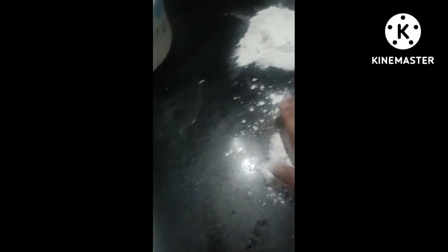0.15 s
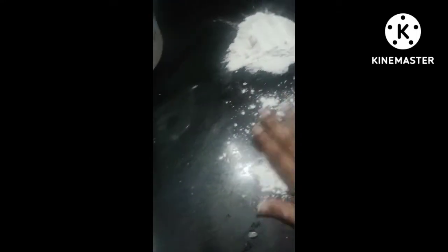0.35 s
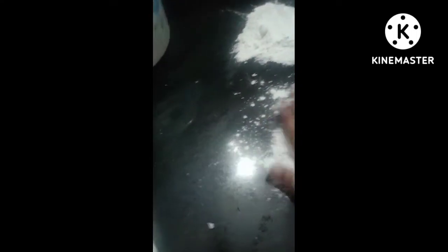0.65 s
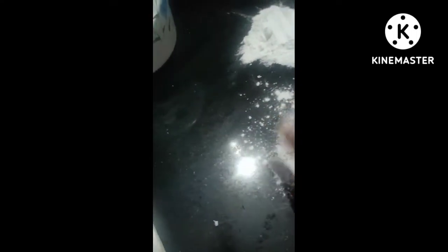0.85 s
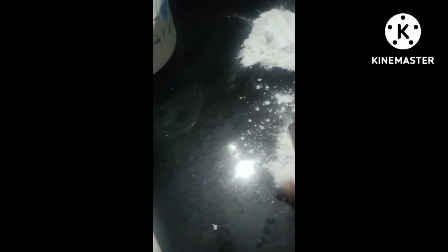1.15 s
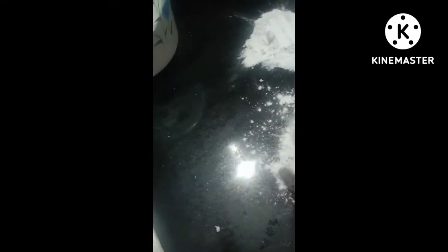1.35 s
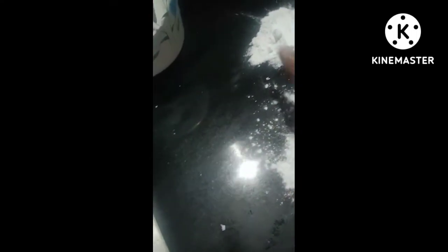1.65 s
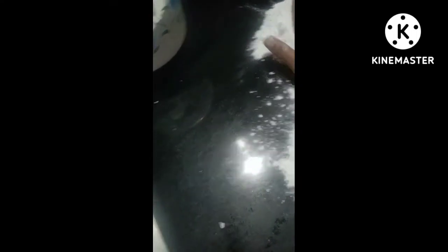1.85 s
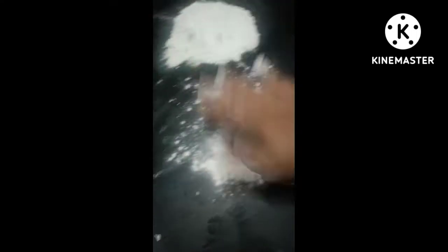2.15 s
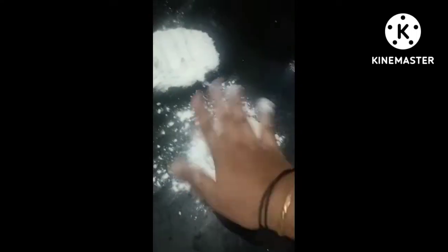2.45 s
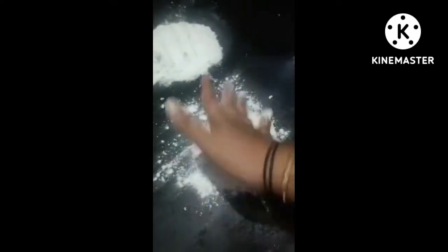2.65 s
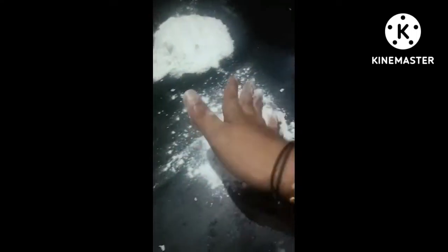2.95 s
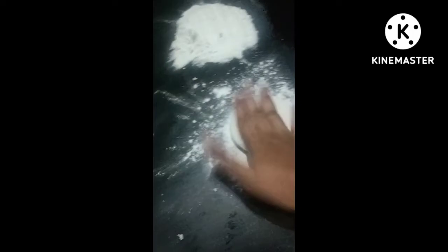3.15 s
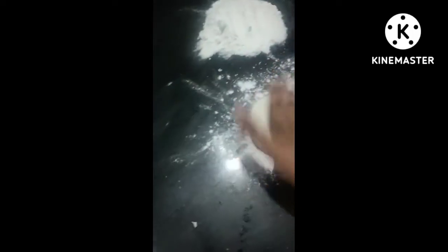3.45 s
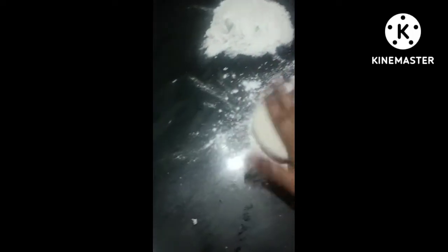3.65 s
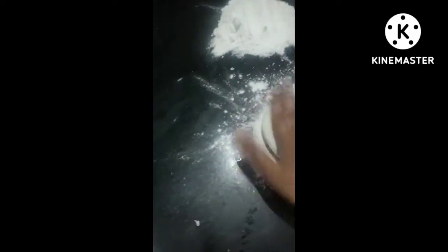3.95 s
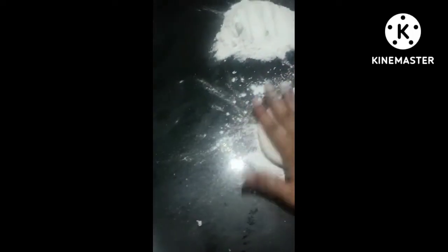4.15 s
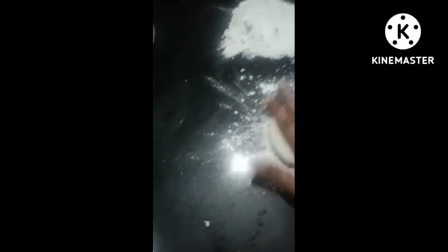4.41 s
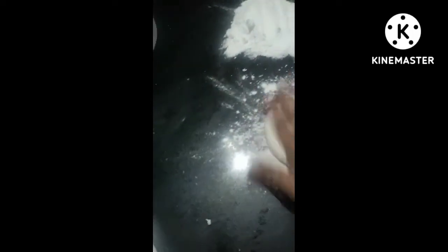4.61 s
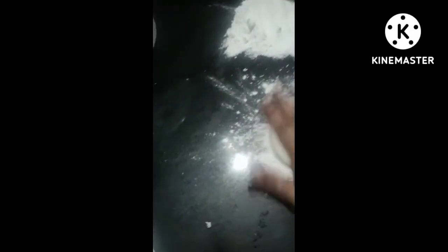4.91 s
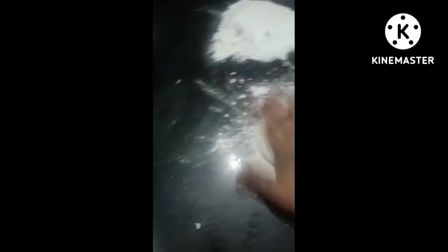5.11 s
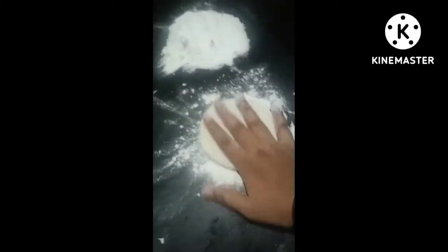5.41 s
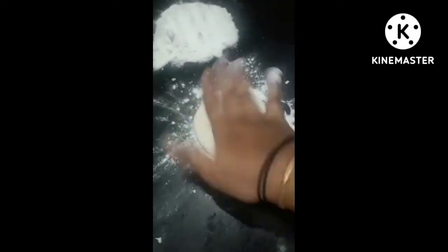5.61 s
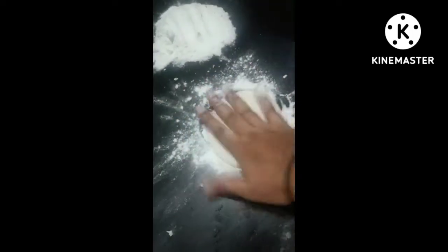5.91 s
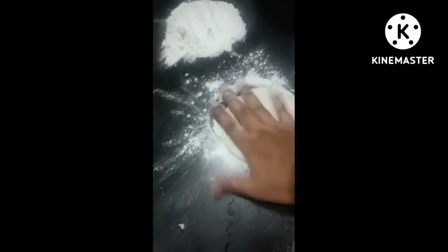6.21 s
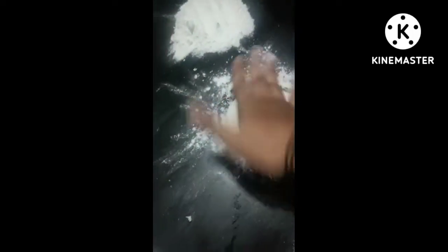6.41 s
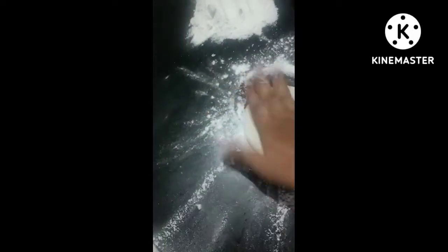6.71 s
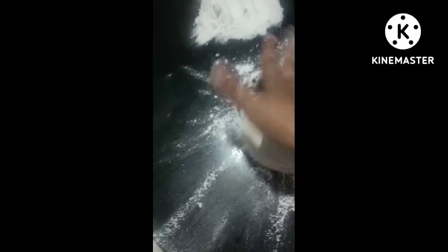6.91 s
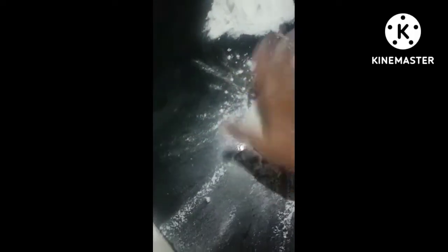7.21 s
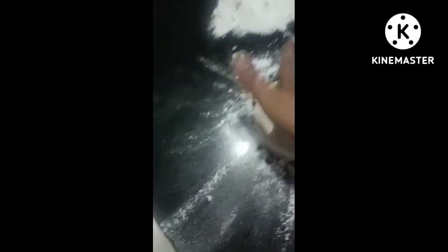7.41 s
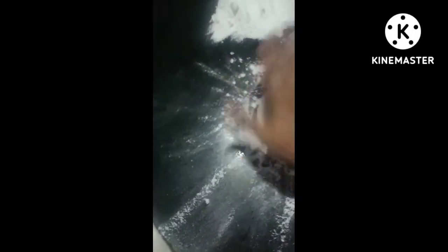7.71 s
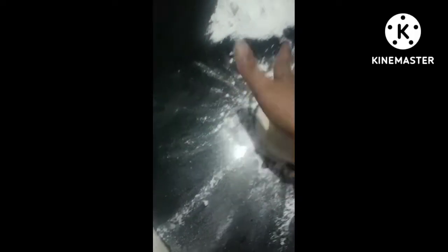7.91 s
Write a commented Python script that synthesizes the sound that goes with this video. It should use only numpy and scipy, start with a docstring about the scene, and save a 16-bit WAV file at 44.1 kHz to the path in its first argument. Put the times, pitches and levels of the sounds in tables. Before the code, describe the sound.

A hand pats floured dough on a hard kitchen counter, close to the microphone. Light fingertip touches lead into a few hollow, cupped pats. After a brief lull, the hand slaps flatter in an even rhythm, almost four times a second, mostly harder towards the end. Faint gritty rubbing and a few crisp ticks fall between pats. The small room rings briefly over a low rumble and hiss.

```python
"""A hand pats floured dough on a stone kitchen counter, close to a phone with two microphone ports.
First come light fingertip touches over the room's rumble and hiss. From about half a second, a cupped
hand pats the ball of dough: fingers land, the palm pops its trapped air, the small hard room rings.
Between pats the hand drags over flour, with a few crisp ticks. After 2.6 s the hand is flatter and
pats almost four times a second, mostly harder towards the end."""
import sys
import numpy as np
from scipy import signal
from scipy.fft import rfft, irfft, next_fast_len
from scipy.io import wavfile
from scipy.ndimage import uniform_filter1d

SR = 44100
rng = np.random.default_rng(int(sys.argv[2]) if len(sys.argv) > 2 else 0)


def store_pcm(level_fs):
    """Save levels as 16-bit WAV."""
    pcm = np.round(np.clip(level_fs, -1, 1) * 32767).astype(np.int16)
    wavfile.write(sys.argv[1], SR, np.atleast_2d(pcm).T)


N = 355446
LEAD_S = 0.01  # time kept free before each landing, for the fingers


def amp(db):
    """Turn decibels into a gain."""
    return 10 ** (np.asarray(db) / 20)


def unit(x):
    """Scale x to an average power of 1."""
    return x / np.sqrt(np.mean(x ** 2) + 1e-20)


def along(points, hz):
    """Read a curve of (pitch_hz, value) points on a log pitch scale."""
    pitches, values = np.transpose(points)
    return np.interp(np.log(hz + 1), np.log(pitches + 1), values)


def filtered(x, response):
    """Multiply each frequency in x by response(hz)."""
    size = next_fast_len(x.shape[-1] + 8192)
    hz = np.fft.rfftfreq(size, 1 / SR)
    return irfft(rfft(x, size) * response(hz), size)[..., :x.shape[-1]]


def coloured(x, tone):
    """Shape x with a curve of (pitch_hz, level_db) points."""
    return filtered(x, lambda hz: amp(along(tone, hz)))


def add(track, x, start_s):
    """Mix x into the track."""
    part = track[:, max(round(start_s * SR), 0):][:, :x.shape[1]]
    part += x[:, :part.shape[1]]


# How alike left and right are: pitch_hz, likeness (1 = the same)
LIKENESS = [(60, 0.94), (150, 0.53), (380, 1), (950, 0), (2380, 0), (5980, 0), (15000, 0.14)]
def stereo(spectra, hz):
    """Blend two unrelated noises into left and right, alike in the bass."""
    angle = np.arccos(np.clip(along(LIKENESS, hz), -1, 1))[:, None] / 2
    shared, side = spectra[0] * np.cos(angle), spectra[1] * np.sin(angle)
    return np.array([shared + side, shared - side])


def rush(tone, patchy_db=1.5):
    """Stereo noise with random louder and softer patches."""
    hz, _, spectra = signal.stft(rng.standard_normal((2, N)), SR, nperseg=512)
    patches = rng.standard_normal(spectra.shape[1:])
    patches = uniform_filter1d(uniform_filter1d(patches, 10, 0), 10, 1)
    _, noise = signal.istft(stereo(spectra, hz) * amp(patchy_db * unit(patches)), nperseg=512)
    return unit(coloured(noise[:, :N], tone))


# Tones of the room's rumble, hiss and thin whine: pitch_hz, level_db
RUMBLE_TONE = [(12, -35), (20, -9), (40, -15), (70, -9.5), (113, -2.5), (200, -31.5), (260, -76),
               (440, -120)]
HISS_TONE = [(25, -8), (110, -8.5), (200, -9), (370, -3.5), (880, -18.5), (2000, -29), (3500, -40.5),
             (6000, -34), (10000, -42), (12500, -43.5), (15900, -50)]
WHINE_TONE = [(3900, -42.5), (4500, -5), (4750, 8.5), (5100, -2.5), (5800, -21), (6400, -52.5)]
# How the background rises and falls: time_s, rumble_db, hiss_db
AIR_LEVELS = [(0.0, -64, -62), (0.87, -62, -57), (2.02, -62.5, -63.5), (2.53, -64.5, -58.5),
              (5.09, -54.5, -52.5), (5.72, -68, -60.5), (6.06, -53, -50.5), (8.06, -58, -52)]
def kitchen_air():
    """A low rumble, a faint hiss and a thin, steady whine."""
    times, rumble_db, hiss_db = np.transpose(AIR_LEVELS)
    t = np.arange(N) / SR
    rumble = amp(np.interp(t, times, rumble_db)) * rush(RUMBLE_TONE)
    hiss = amp(np.interp(t, times, hiss_db)) * rush(HISS_TONE)
    return rumble + hiss + amp(-86.5) * rush(WHINE_TONE)


# Sheen, the finest noise of skin and flour: pitch_hz, level_db
SHEEN_TONE = [(5000, -2.5), (9000, 0.5), (11500, 2.5), (14000, -10), (15900, -22.5)]
# Crisp ticks between pats: start_s, level_db
CRISP_TICKS = [(0.1357, -46), (0.154, -46), (2.3324, -45), (2.4843, -49), (4.2323, -56), (6.314, -38),
               (6.3879, -48.5), (6.563, -63.5), (6.642, -32.5), (6.9152, -53)]
def ticks():
    """Short, bright bursts of noise."""
    track, t = np.zeros((2, N)), np.arange(SR // 30) / SR
    for start_s, level_db in CRISP_TICKS:
        burst = amp(level_db - 60 * t / 0.023) * (1 - np.exp(-t / 0.00089))
        add(track, burst * rng.standard_normal((2, len(t))), start_s)
    return coloured(track, SHEEN_TONE)


def blip(t, hz, cycles):
    """The hollow of the hand sounds for a few soft cycles."""
    age = 3 * t * hz / cycles
    return np.sin(2 * np.pi * hz * t) * age * np.exp(1 - age)


def scuffs(per_second=400, hollow_hz=1300):
    """Flour lumps catch under the cupped palm and sound near its pitch."""
    track, t = np.zeros((2, N)), np.arange(SR // 30) / SR
    for when, pitch, softness, side in rng.random((round(per_second * N / SR), 4)):
        hz = hollow_hz * np.exp(0.55 * (pitch - 0.5))
        grain = amp(-14 * softness) * blip(t, hz, cycles=8.6)
        add(track, grain * amp([[6 * side - 3], [3 - 6 * side]]), when * N / SR)
    return unit(track)


# Tone of rubbed flour: pitch_hz, level_db
FLOUR_TONE = [(400, -37), (800, 1.5), (1300, -4.5), (2000, -8), (3500, -16), (5000, -20), (7000, -14),
              (9600, -18), (12000, -22), (15900, -39)]
# Strokes of the hand: middle_s, level_db
STROKES = [(0.147, -59), (0.43, -60), (0.71, -61.5), (0.972, -63.5), (1.233, -63), (1.458, -61),
           (2.335, -52.5), (2.6, -62), (2.874, -58.5), (3.16, -60), (3.424, -55.5), (3.672, -55.5),
           (3.927, -54.5), (4.199, -51), (4.463, -53), (4.711, -52), (4.937, -50), (5.23, -55),
           (5.487, -52.5), (5.75, -51.5), (6.029, -47.5), (6.304, -52), (6.571, -51), (6.808, -51),
           (7.053, -49), (7.328, -49), (7.596, -51.5), (7.851, -51), (8.045, -50)]
def flour_drags(half_stroke_s=0.053):
    """Skin slides over flour as the hand turns the dough: a gritty swell."""
    t = np.arange(N) / SR
    swells = sum(amp(db) * np.exp(-((t - middle_s) / half_stroke_s) ** 2) for middle_s, db in STROKES)
    grit = amp(1.5 * unit(uniform_filter1d(rng.standard_normal(N), 60)))
    return swells * (unit(grit * rush(FLOUR_TONE)) + amp(-8.5) * scuffs())


# Tone of the room's echo: pitch_hz, level_db
ECHO_TONE = [(60, -10), (150, 6), (400, 9), (900, -3), (1800, -0.5), (3500, -11.5), (7000, 2.5),
             (14000, -7.5)]
# Time the echo takes to fall by 60 dB: pitch_hz, fade_s
ECHO_FADES = [(80, 1), (200, 0.38), (450, 0.24), (1100, 0.3), (2900, 0.49), (7700, 0.23), (14000, 0.56)]
def room_echo():
    """The walls answer with noise that dies away, each pitch at its own speed."""
    length = SR // 2
    hz, t, spectra = signal.stft(rng.standard_normal((2, length)), SR, nperseg=256)
    fade = amp(along(ECHO_TONE, hz)[:, None] - 60 * t / along(ECHO_FADES, hz)[:, None])
    _, tail = signal.istft(stereo(spectra, hz) * fade, SR, nperseg=256)
    rise = 1 - np.exp(-np.arange(length) / SR / 0.00027)
    return unit(tail[:, :length]) * rise / np.sqrt(length)


def place(track, direct, blow, start_s, level_db, echo_db):
    """The hand is louder on the right but reaches the left first; its blow echoes to both."""
    delayed = np.pad(direct, (5, 0))[:len(direct)]
    near = np.array([direct, delayed]) * amp([[-1.75], [1.75]])
    echo = signal.fftconvolve(blow[None], room_echo(), axes=1)
    add(track, amp(level_db) * near, start_s - LEAD_S)
    add(track, amp(level_db + echo_db) * echo, start_s - LEAD_S + 0.001002)


# Notes of the counter and room: pitch_hz, level_db, fade_s (to fall by 60 dB)
RING_NOTES = [(88.36, -10, 0.58), (145.4, -8.5, 0.16), (196, -11, 0.47), (235.9, 3.5, 0.32),
              (303, -23, 0.56), (355, -19, 0.11), (446.4, -3, 0.4), (488.4, 2, 0.34), (565, -2.5, 0.29),
              (637, -22.5, 0.11), (741, -5.5, 0.41), (798, 6.5, 0.22), (842, -0.5, 0.24)]
def counter_ring(middle_db):
    """Counter and room ring on; where the hand lands favours the low or the middle notes."""
    t = np.arange(SR // 2) / SR
    balance = [(250, -middle_db / 2), (500, middle_db / 2), (800, -7)]
    notes = np.zeros((2, len(t)))
    for hz, level_db, fade_s in RING_NOTES:
        struck_db = level_db + along(balance, hz) + rng.normal(0, 2.38)
        phase = rng.normal(0, 0.5, (2, 1))
        notes += amp(struck_db - 60 * t / fade_s) * np.sin(2 * np.pi * hz * t + phase)
    return notes * (1 - np.exp(-t / 0.013))


# The crack of skin on dough: pitch_hz, level_db
CRACK_TONE = [(1300, 1), (2200, -3.5), (2700, -3.5), (3200, -9), (4700, -10.5), (6000, -21), (8000, -20.5),
              (10000, -31.5), (12000, -39), (15900, -47)]
# Light touches: start_s, level_db, pitch_hz, crack_db
TOUCHES = [(0.136, -59, 1030, -6), (0.154, -46, 1300, -9), (0.266, -54, 1050, -20),
           (0.419, -44.5, 1330, -5), (0.527, -52, 1050, -23), (0.704, -40.5, 1120, -13),
           (0.945, -45, 1250, -8.5), (1.232, -47, 1100, -7), (1.447, -47, 1300, -21),
           (2.592, -42.5, 1390, -20), (2.867, -40, 1410, -16), (3.143, -43.5, 1400, -12.5),
           (3.385, -51, 1380, -12)]
def fingertips():
    """A fingertip lands softly: the hollow hand sounds, with a faint crack of skin."""
    track = np.zeros((2, N))
    t = np.maximum(np.arange(SR // 40) / SR - LEAD_S, 0)
    for start_s, level_db, hz, crack_db in TOUCHES:
        skin = unit(coloured(rng.standard_normal(len(t)), CRACK_TONE))
        touch = blip(t, hz, cycles=4) + amp(crack_db - 60 * t / 0.03) * (t > 0) * skin
        place(track, touch, touch, start_s, level_db, echo_db=0)
    return track


def puff(t, hz, width_cycles):
    """A pocket of air is squeezed out: a cycle or two."""
    return -np.sin(2 * np.pi * hz * t) * np.exp(-(t * hz / width_cycles) ** 2)


def slap(pop_hz, ahead_s, thud_db, crack_db, sheen_db, hollow_db):
    """Four fingers land ever harder, then the palm. Gives the direct sound and the blow that echoes."""
    def skin(x):
        crack = amp(crack_db) * unit(coloured(x, CRACK_TONE))
        return crack + amp(sheen_db) * unit(coloured(x, SHEEN_TONE))

    t = np.arange(SR // 40) / SR - LEAD_S  # the palm lands at t = 0
    fingers = np.zeros(len(t))
    for early, pitch in rng.random((2, 4)).T:
        finger_t = t + 0.000763 + early * ahead_s
        fingers += amp(-5 - 10 * early) * puff(finger_t, pop_hz * (0.5 + 1.32 * pitch), 0.49)
    # The cupped palm rings on at the pitch of its pop.
    after = np.maximum(t, 0)
    hollow = amp(hollow_db - 60 * after / 0.031) * np.sin(2 * np.pi * pop_hz * after)
    pop = puff(t, pop_hz, 0.73) - hollow
    thud = amp(thud_db) * (puff(t, 522, 0.98) + amp(-9.5) * puff(t, 230, 0.6))
    rise = amp(16 * t / ahead_s) * (t > -1.5 * ahead_s)
    swell = np.where(t < 0, rise, amp(-60 * t / 0.021))
    direct = fingers + pop + thud + skin(rng.standard_normal(len(t))) * swell
    click = signal.unit_impulse(len(t), round(LEAD_S * SR))
    blow = amp(-1.5) * pop + amp(1.5) * thud + amp(-7) * skin(click)
    return direct, blow


# Pats: start_s (palm lands), level_db, pop_hz, ahead_s (fingers before palm), thud_db, ring_db,
# middle_db (middle ringing notes over low ones)
PALM_PATS = [(0.5613, -27.5, 1140, 0.0033, -9, -21.5, 13), (0.8334, -36.5, 1085, 0.0062, -13, -19.5, -14),
             (1.0825, -35.5, 1160, 0.002, -8, -25, -16), (1.3478, -26.5, 1150, 0.00063, -5.5, -23, -5),
             (2.1752, -37, 1260, 0.0052, 0, -11, 25), (2.47, -40, 1250, 0.008, 2, -9.5, -8),
             (2.744, -26, 1090, 0.0015, 2.5, -11, -2), (3.0175, -26.5, 1340, 0.00146, 6, -9.5, 19.5),
             (3.2716, -26.5, 785, 0.0056, 3.5, -8.5, 3.5), (3.532, -22.5, 1150, 0.00545, 5, -8.5, 0.5),
             (3.7873, -24.5, 1270, 0.0019, -4, -11, 8), (4.051, -30.5, 900, 0.0046, -6, -18, -8),
             (4.323, -21, 1390, 0.00337, -1.5, -15, -2.5), (4.5914, -17.5, 940, 0.0075, -1.3, -13, 7),
             (4.8425, -5, 1350, 0.0019, -4.5, -17, 2), (5.0995, -23, 2280, 0.00504, -4, -19, -9.5),
             (5.3672, -24.5, 1420, 0.0075, 4.5, -8.5, 6.5), (5.6403, -15, 1290, 0.00217, -5, -17, -1),
             (5.9089, -10, 1460, 0.00414, -2, -16, 3), (6.1749, -10.5, 1110, 0.0045, -13, -17.5, -2.5),
             (6.4344, -12.5, 1130, 0.0046, -4.5, -14, -6.5), (6.6911, -18, 1000, 0.0034, -4, -12, 0),
             (6.954, -14.5, 1090, 0.0053, -7.5, -15, 13.5), (7.2176, -8, 960, 0.00354, -11.5, -17.5, -3),
             (7.4664, -9, 1000, 0.00215, -5, -18, -4.5), (7.7323, -11.5, 1010, 0.00373, -1.5, -13, -4),
             (7.9936, -4, 1380, 0.0049, -6.5, -22, 9.5)]
def pats(ball_until_s=2.6, usual_db=-20):
    """The hand pats the dough; a harder pat gains more pop than skin noise or echo."""
    track = np.zeros((2, N))
    for start_s, level_db, pop_hz, ahead_s, thud_db, ring_db, middle_db in PALM_PATS:
        harder_db = level_db - usual_db
        cupped = start_s < ball_until_s  # the hand curves round the ball of dough
        sheen_db = -29.5 - 0.05 * harder_db + 0.23 * thud_db  # a flatter hand: more thud, more skin
        crack_db = -10.5 - 0.17 * harder_db - 4 * cupped
        echo_db = -4.5 - 0.11 * harder_db - 2 * cupped
        hollow_db = -25 + 17 * cupped
        direct, blow = slap(pop_hz, max(ahead_s, 0.001), thud_db, crack_db, sheen_db, hollow_db)
        place(track, direct, blow, start_s, level_db, echo_db)
        add(track, amp(level_db + ring_db) * counter_ring(middle_db), start_s)
    return track


def scene():
    """The hand's sounds over the kitchen air."""
    return pats() + fingertips() + flour_drags() + ticks() + kitchen_air()


# Tone of each microphone port: pitch_hz, gain_db
LEFT_PORT = [(60, -6), (200, -4.5), (380, -10), (1300, -1.5), (4000, 5), (7000, -11), (8200, -1.5),
             (9700, 8.5), (11500, -1.5), (14000, 4.5)]
RIGHT_PORT = [(60, -5), (200, -9), (380, -9.5), (1300, 1), (4000, 6.5), (6900, 2), (8000, -8.5),
              (9700, -25.5), (11500, -9), (14000, 6)]
def record(dry, ceiling=0.9, top_hz=15950):
    """Each port rings in its own way in the treble; loud peaks are squeezed and the very top is cut."""
    heard = filtered(dry, lambda hz: amp([along(LEFT_PORT, hz), along(RIGHT_PORT, hz)]))
    squeezed = heard / (1 + np.abs(heard / ceiling) ** 6) ** (1 / 6)
    return filtered(squeezed, lambda hz: hz < top_hz)


dry = scene()
out = record(dry)
store_pcm(out)
```